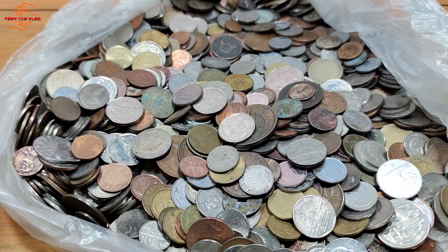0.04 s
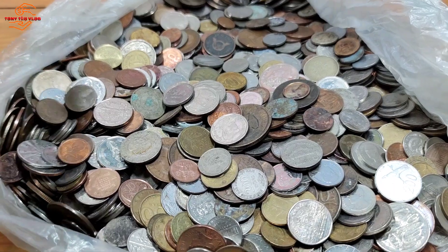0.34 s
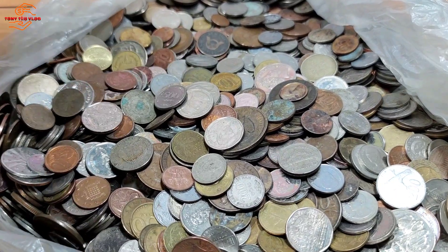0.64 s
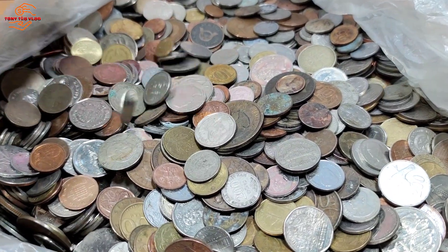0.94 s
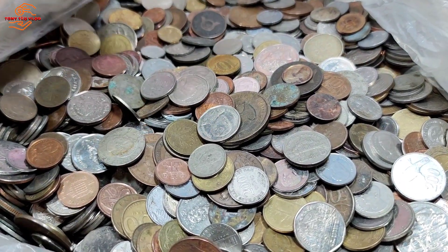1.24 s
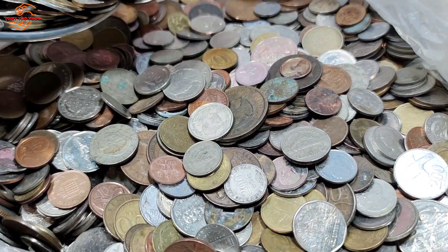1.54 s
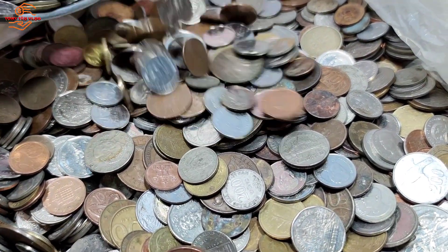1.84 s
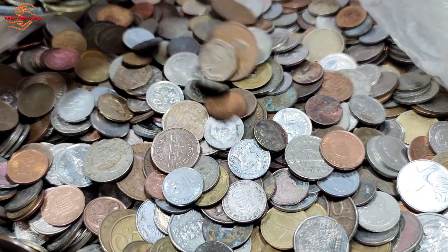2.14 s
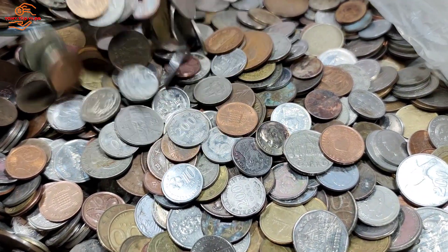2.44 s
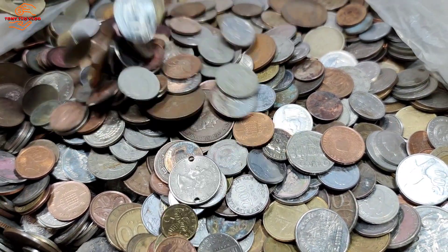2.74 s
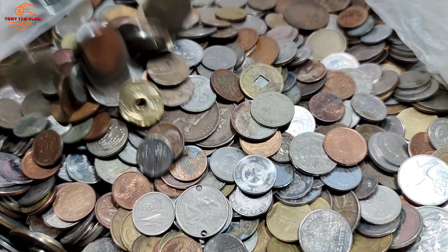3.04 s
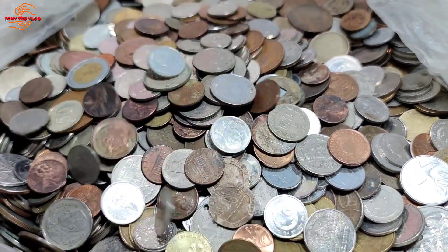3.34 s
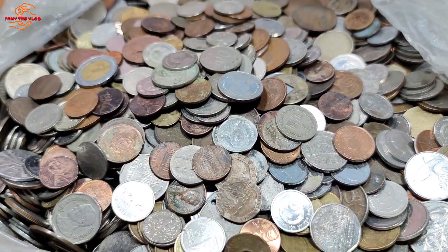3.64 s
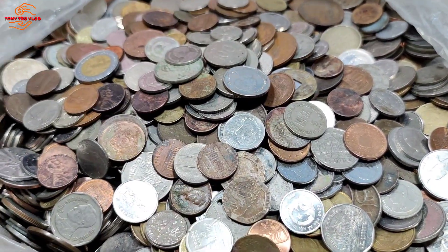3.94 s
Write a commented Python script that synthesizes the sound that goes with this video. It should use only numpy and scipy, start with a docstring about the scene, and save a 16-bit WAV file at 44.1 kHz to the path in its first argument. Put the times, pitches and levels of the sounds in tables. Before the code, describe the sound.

Coins pour from a metal scoop onto a heap, scraping and clinking close up.

```python
"""Coins pour from a metal scoop onto a heap of coins in a plastic bag on a wooden table, very close.
They scrape along the scoop and excite its resonance; a few drop, then the rest tumble down in surges.
Each impact radiates a click, struck coins ring in damped modes, and landing clumps make the table thud.
The left microphone favours the bright clink, the right the lower rasp; the loudest hits overload both."""
import sys
import numpy as np
from scipy import signal
from scipy.io import wavfile

SR = 44100
rng = np.random.default_rng(int(sys.argv[2]) if len(sys.argv) > 2 else 0)


def transcribe(signal):
    """Save signal, clipped to [-1, 1], as a 16-bit WAV file at the path in sys.argv[1]."""
    frames = np.atleast_2d(signal).T
    limited = np.clip(frames, -1, 1)
    pcm = np.round(limited * 32767).astype(np.int16)
    wavfile.write(sys.argv[1], SR, pcm)


N = 176400

# spectrum of the room noise: frequency_hz, left_db, right_db
ROOM_COLOUR = [(25, -1, -23.5), (100, 0.5, -1), (200, -9, -9), (400, -8, -8.5), (990, -18, -13.5),
               (2500, -27, -17), (4500, -35, -37), (7100, -40, -38), (8440, -23.5, -50),
               (11000, -43.5, -44), (15000, -34.5, -51)]
# envelope of the room noise: time_s, level_db
ROOM_LEVEL = [(0, -90), (.04, -82), (.065, -56.5), (.3, -46), (2, -41), (4, -47.5)]

# resonance of the scoop, rising as it empties: time_s, pitch_hz
SCOOP_PITCH = [(.35, 2480), (.6, 2320), (1.3, 2630), (1.689, 2790), (1.74, 2540), (3.1, 2757), (3.75, 2800),
               (3.8, 2857)]
# four slides along the scoop, one envelope each: time_s, level_db
SLIDES = [
    [(.3, -63), (.34, -37.5), (.47, -28.5), (.55, -21), (.62, -19), (.8, -18), (.865, -20.5), (.9, -29.5),
     (.99, -41.5)],
    [(1.0, -42), (1.1, -29.5), (1.18, -31), (1.25, -23), (1.28, -20), (1.39, -23), (1.48, -32.5),
     (1.55, -52), (1.6, -39)],
    [(1.59, -54), (1.677, -29.5), (1.69, -19), (1.74, -17.5), (1.81, -19), (1.95, -34), (2.1, -25),
     (2.3, -29.5), (2.78, -26.5), (2.95, -41), (3.09, -28), (3.2, -33.5), (3.54, -47)],
    [(3.67, -55), (3.715, -37), (3.76, -33), (3.82, -31), (3.845, -48), (3.95, -74.5)],
]
# shimmer of rubbing coin faces, one value for each slide: gain_db
SHEEN_DB = [-5, -12, -12, 8]
# spectrum of sliding coins: frequency_hz, left_db, right_db
SLIDE_COLOUR = [(60, -24, -20), (250, -37, -27.5), (775, -13, -20.5), (1430, -14.5, -17), (1960, -9.5, -11),
                (2340, -12.5, -2.5), (3040, -10, -6), (3850, -15.5, -24.5), (5430, -18, -18),
                (6620, -18, -31), (7940, -3, -28), (8410, 1, -44), (10050, -7, -49.5), (11700, -14.5, -20),
                (13400, -9, -18), (15800, -34, -11)]
# coins knocking on the scoop: start_s, pitch_hz, left_db, right_db, t60_s
KNOCKS = [(.871, 2320, -24, 7.5, 0.011), (1.68, 2860, 7, 19.5, 0.0051), (1.717, 2770, -5, 9, .008),
          (1.727, 2640, -20, -3, .04), (2.759, 2820, -34.5, -19, 0.12), (3.083, 2833, -33, -11.5, .12),
          (3.775, 3090, -29, -14, 0.087)]

# clumps landing on the heap: start_s, clatter_db, thud_db
LANDINGS = [(0.982, -26.5, -42), (1.007, -24, -20), (1.112, -32, -13), (1.435, -20.5, -19),
            (1.536, -35.5, -10), (1.757, -27.5, -35), (1.83, -17.5, -19), (1.847, -19, -18.5),
            (1.963, -35.5, -16), (2.034, -30, -8), (2.057, -32, -15.5), (2.152, -28, -35),
            (2.17, -25, -9.5), (2.277, -28, -25), (2.496, -26.5, -17), (2.581, -24, -17), (2.597, -25, -13),
            (2.795, -26, -39), (2.88, -26, -27), (2.912, -34, -17), (2.957, -36.5, -17.5),
            (2.988, -29.5, -10), (3.023, -40, -16), (3.125, -23.5, -19), (3.142, -17, -9),
            (3.156, -20.5, -14), (3.264, -25, -21), (3.288, -26.5, -20), (3.33, -32.5, -10),
            (3.371, -26, -12.5), (3.396, -28, -14), (3.441, -33.5, -22), (3.474, -30, -8.5),
            (3.509, -24.5, -14), (3.596, -29, -7)]
# spectrum of a landing's clatter: frequency_hz, left_db, right_db
CLATTER_COLOUR = [(30, 12, -13.5), (120, 4, -32), (288, 5.5, -14.5), (700, 3, -15), (1510, 0, -15),
                  (3220, -1.5, -15), (4840, -9.5, -22.5), (7700, -21.5, -20), (9900, -7, -29),
                  (12700, -1, 2), (16000, -16, -10)]
# coins that ring freely: start_s, pitch_hz, left_db, right_db
RINGS = [(0.591, 9950.0, -15, -51), (1.004, 13480, -22, -14), (1.442, 11500, -22, -45),
         (1.777, 15520.0, -18, -26), (1.83, 9860, -13, -38), (1.987, 9350.0, -15, -54),
         (2.057, 12160, -18, -49), (2.157, 10000.0, -19, -46), (2.172, 14670.0, -26, -13),
         (2.227, 12500, -15.5, -35), (2.277, 9900, -23, -38), (2.327, 13400, -23, -15),
         (2.412, 13400, -18.5, -25), (2.409, 14000, -32, -19), (2.581, 10100, -10.5, -37),
         (2.671, 9620, -12.5, -55), (2.726, 9910, -8, -30), (2.761, 13000, -27, -13),
         (2.859, 9800, -10, -35), (3.015, 14300, -36, -15.5), (3.072, 9860, -9.5, -38),
         (3.239, 13500, -21, -16), (3.403, 15420.0, -13, -26), (3.507, 9760, -16.5, -37),
         (3.635, 13700, -30, -37)]
# single sharp clinks: start_s, length_s, edge_db, rasp_db
CLINKS = [(0.359, 0.0038, -13.5, -13.5), (0.561, 0.0032, -6.5, -36), (0.752, 0.0094, -5.5, -15),
          (0.77, 0.018, -7.5, -12), (0.817, 0.0053, -3.5, -9), (0.981, 0.0027, -7, -11),
          (1.004, 0.0055, -3, -16.5), (1.116, 0.0014, -8, -21), (1.129, 0.0022, -13, -16),
          (1.159, 0.0021, -18, -15), (1.199, 0.0048, -12, -14), (1.229, 0.0029, -14, -22),
          (1.263, 0.011, -2.5, -11), (1.305, 0.0023, -0.5, -18), (1.368, 0.0044, -6.5, -10),
          (1.435, 0.0082, -5.5, -23), (1.541, 0.0019, -7.5, -22), (1.656, 0.0017, -19, -22),
          (2.058, 0.0031, -6.5, -22), (2.087, 0.0026, -8, -28), (2.1, 0.0076, -5, -22),
          (2.15, 0.0072, -6.5, -25), (2.274, 0.0095, -5, -15.5), (2.435, 0.0016, -12, -34),
          (2.46, 0.001, -1, -19.5), (2.494, 0.014, -9, -30), (2.795, 0.004, -11, -19),
          (2.989, 0.002, -10, -23), (3.067, 0.0076, -9, -26), (3.116, 0.0095, -6.5, -22),
          (3.182, 0.0047, -11, -24), (3.283, 0.0062, -15, -26), (3.325, 0.0015, -4.5, -23),
          (3.378, 0.0065, -5, -33), (3.476, 0.0023, -8, -22), (3.511, 0.0019, -2, -20),
          (3.585, 0.00082, -11.5, -30), (3.597, 0.0015, -6, -28), (3.638, 0.0015, -19, -33),
          (3.646, 0.002, -14.5, -31.5)]
# spectra of a clink's bright edge and of its rasp: frequency_hz, left_db, right_db
EDGE_COLOUR = [(100, -12.5, -66), (1500, -46, -55.5), (3680, -19, -16.5), (6700, -29.5, -21.5),
               (8260, 6, -57), (10030, -0.5, -18.5), (11060, -6, -57), (13400, -11, -5),
               (15400, -6.5, -27.5)]
RASP_COLOUR = [(100, -50, -26.5), (800, -27, -10.5), (1590, -12.5, -7), (2250, -36, 9), (2840, -3, 11),
               (3900, -6, -4.5), (7560, -51, -14.5), (15300, -7, -32)]

# a few coins tumbling before and after the pour, one envelope per drop: time_s, level_db
DROPS = [
    [(.5, -62), (.58, -34), (.86, -49), (.9, -54)],
    [(.98, -16), (1.01, -27), (1.06, -24.5), (1.11, -46)],
    [(1.425, -40), (1.44, -14.5), (1.48, -24.5), (1.53, -31), (1.56, -31.5), (1.6, -39)],
    [(3.52, -48), (3.56, -47), (3.605, -28.5), (3.65, -32.5), (3.69, -48.5), (3.76, -40.5), (3.81, -49),
     (3.85, -66)],
]
# envelope of the main pour: time_s, level_db
POUR_LEVEL = [(1.69, -32), (1.77, -24), (1.92, -22.5), (2.03, -23), (2.2, -21), (2.47, -22), (2.65, -18.5),
              (2.95, -24.5), (3.22, -25), (3.42, -21), (3.53, -33.5)]
# surges of the pour, as a batch leaves the scoop: start_s, length_s, rise_db
SURGES = [(1.755, 0.16, 6.5), (2.088, 0.013, 6), (2.16, 0.022, 6), (2.268, 0.011, 6), (2.33, 0.037, 6),
          (2.419, 0.032, 4), (2.493, 0.026, 7), (2.56, 0.044, 6.5), (2.703, 0.14, 2), (2.868, 0.065, 6),
          (2.984, 0.029, 7), (3.076, 0.11, 7.5), (3.245, 0.036, 6.5)]
# spectrum of tumbling coins: frequency_hz, left_db, right_db
POUR_COLOUR = [(60, -5, -19), (260, -13.5, -26.5), (690, -13.5, -18), (1470, -19, -22), (2400, -25, -22),
               (3740, -25.5, -34.5), (7200, -27, -25.5), (8290, -3.5, -51), (10530, -10.5, -30),
               (11700, -16.5, -30.5), (12530, -11, -14), (14140, -15.5, -13), (15600, -9.5, -17)]

HUM_HZ, HUM_DB = 97, -46
ECHO_DB, ECHO_T60_S = -18.5, .13
SLIDE_DB, SLIDE_PER_S, SLIDE_SPREAD_DB = 4.5, 2600, 3.5
SCOOP_WIDTH_HZ, SCOOP_LEFT_DB, SCOOP_RIGHT_DB = 1000, -20.5, -1.5
GRIT_PER_S, GRIT_SPREAD_HZ, GRIT_T60_S = 200, 300, .04  # harder contacts within a slide
SHEEN_HZ, SHEEN_WIDTH_HZ = 8450, 900
KNOCK_RISE_S = .0017
CLATTER_DB, CLATTER_RISE_S, CLATTER_FALL_S = 14.5, .0031, .0077
THUD_DB, THUD_HZ, THUD_PEAK_S = 2, 89, .0068
TABLE_DB, TABLE_HZ, TABLE_T60_S = -9.5, 272, .045
RING_DB, RING_T60_S, RING_BLUR_HZ = 5.5, .17, 35
TWIN_DB, MEAN_SPLIT_HZ = .5, 44  # a ringing coin's second mode
EDGE_DB, RASP_DB, CLINK_FALL_S, CLINK_DRAG = 1.5, 2.5, .002, .45
POUR_DB, POUR_PER_S, POUR_SPREAD_DB, SURGE_FALL_S = 4.5, 600, 2, .013
JINGLE_DB, JINGLE_PER_S, JINGLE_SPREAD_DB, JINGLE_T60_S = -1.5, 1800, 2.4, .06
JINGLE_LOW_HZ, JINGLE_HIGH_HZ, JINGLE_DETUNE_HZ = 2189, 15500, 92
CHATTER_DB, CHATTER_T60_S = -3, .026
CEILING, BAND_LIMIT_HZ = .95, 15850
TIME_S, LEFT_ONLY = np.arange(N) / SR, np.c_[[1, 0]]


def amp(db):
    """Amplitude grows tenfold for every 20 dB."""
    return 10 ** (np.asarray(db) / 20)


def unit(x):
    """Normalisation to an rms of 1."""
    return x / np.sqrt(np.mean(x ** 2) + 1e-20)


def decay(t, t60):
    """Exponential damping: 60 dB down after t60 seconds."""
    return amp(-60 * t / t60)


def level(curve):
    """Amplitude envelope, linear in decibels between its points and silent outside them."""
    return amp(np.interp(TIME_S, *np.transpose(curve), left=-120, right=-120))


def add(mix, start_s, sound):
    """Superposition: a sound adds to the mix, in place."""
    part = mix[:, max(round(start_s * SR), 0):][:, :sound.shape[-1]]
    part += sound[..., :part.shape[1]]


def convolve(x, response):
    """Linear filtering of each channel by its own impulse response."""
    return signal.fftconvolve(x, response, axes=1)[:, :N]


def colour(x, table, size=4096):
    """Minimum-phase filter per microphone; the stronger side keeps the power of white noise."""
    hz, *sides = np.transpose(table)
    bins_hz = abs(np.fft.fftfreq(size, 1 / SR))
    gain_db = np.array([np.interp(np.log(bins_hz + 1), np.log(hz), side) for side in sides])
    gain_db -= 30 * (bins_hz > BAND_LIMIT_HZ + 900)
    spectrum = np.exp(signal.hilbert(np.log(amp(gain_db))).conj())
    response = np.fft.ifft(spectrum).real[:, :size // 2]
    return convolve(x, response / np.linalg.norm(response, axis=1).max())


def resonate(x, hz, width_hz):
    """Forced vibration of a resonator of gain 1 whose centre follows the curve hz."""
    carrier = np.exp(2j * np.pi * np.cumsum(hz) / SR)
    pole = np.exp(-np.pi * width_hz / SR)
    baseband = signal.lfilter([(1 - pole) ** 2], [1, -2 * pole, pole ** 2], x / carrier + 1e-18)
    return 2 * (carrier * baseband).real


def contacts(per_s, spread_db):
    """Poisson impacts, mostly small, reach the two microphones with different strength."""
    strength = amp(spread_db * np.minimum(rng.exponential(1, N), 3.5))
    struck = rng.random(N) < per_s / SR
    return unit(strength * struck * rng.choice([-1, 1], (2, N)) * rng.uniform(.42, 1, (2, N)))


def rattle(per_s, spread_db):
    """Each impact passes energy to neighbouring coins, which chatter as it decays."""
    hits = contacts(per_s, spread_db)
    retained = decay(1 / SR, CHATTER_T60_S) ** 2
    energy = signal.lfilter([1 - retained], [1, -retained], hits ** 2)
    chatter = np.sqrt(energy) * rng.standard_normal((2, N))
    return unit(hits + amp(CHATTER_DB) * chatter)


def chimes(hits, hz, mean_t60):
    """Impulse response: each contact starts a damped mode at the pitch hz of that moment."""
    out, t60 = np.zeros((2, N)), mean_t60 * (.5 + rng.random(N))
    for i in np.flatnonzero(hits[0]):
        t = np.arange(0, t60[i], 1 / SR)
        ring = np.sin(2 * np.pi * hz[i] * t) * decay(t, t60[i])
        add(out, i / SR, hits[:, i, None] * ring / np.linalg.norm(ring))
    return out


def room_noise():
    """The noise floor: quiet broadband noise and a low hum under one envelope."""
    gain = level(ROOM_LEVEL)
    hum = amp(HUM_DB) * np.sin(2 * np.pi * HUM_HZ * TIME_S) * gain / gain.max()
    return colour(rng.standard_normal((2, N)), ROOM_COLOUR) * gain + hum


def room_echo(x):
    """Reverberation: a diffuse field decays exponentially, uncorrelated at the two microphones."""
    t = np.arange(SR // 2) / SR
    response = rng.standard_normal((2, len(t))) * decay(t, ECHO_T60_S)
    return amp(ECHO_DB) * convolve(x, response / np.linalg.norm(response, axis=1, keepdims=True))


def sliding():
    """Friction: dense contacts drive the scoop's resonance, and rubbing coin faces shimmer."""
    pushes = [level(slide) for slide in SLIDES]
    push = sum(pushes)
    scoop_hz = np.interp(TIME_S, *np.transpose(SCOOP_PITCH))
    scrape = rattle(SLIDE_PER_S, SLIDE_SPREAD_DB)
    hard_hits = contacts(GRIT_PER_S, SLIDE_SPREAD_DB) * push
    grit = chimes(hard_hits, scoop_hz + GRIT_SPREAD_HZ * rng.standard_normal(N), GRIT_T60_S)
    scoop = unit(resonate(scrape, scoop_hz, SCOOP_WIDTH_HZ)) * push + grit
    scoop *= amp(np.c_[[SCOOP_LEFT_DB, SCOOP_RIGHT_DB]])
    sheen = unit(resonate(scrape[0], np.full(N, SHEEN_HZ), SHEEN_WIDTH_HZ))
    sheen *= amp(SHEEN_DB) @ pushes
    return amp(SLIDE_DB) * colour(scrape * push, SLIDE_COLOUR) + scoop + sheen * LEFT_ONLY


def knocks():
    """Impact excitation: a coin catches on the scoop and rings two modes, louder on the right."""
    t, out = np.arange(SR // 6) / SR, np.zeros((2, N))
    for start_s, hz, left_db, right_db, t60 in KNOCKS:
        lower_hz = hz * rng.uniform(.94, .97)
        modes = np.sin(2 * np.pi * hz * t) + .5 * np.sin(2 * np.pi * (lower_hz * t + rng.random()))
        envelope = np.minimum(t / KNOCK_RISE_S, 1) * decay(t, t60)
        add(out, start_s, amp(np.c_[[left_db, right_db]]) * envelope * modes)
    return out


def landings():
    """Momentum transfer: a clump crunches into the heap; the table dips, springs back and rings."""
    t, clatter, thud = np.arange(SR // 12) / SR, np.zeros((2, N)), np.zeros((2, N))
    wood = amp(TABLE_DB) * np.sin(2 * np.pi * TABLE_HZ * t) * decay(t, TABLE_T60_S)
    rise = np.minimum(t / CLATTER_RISE_S, 1)
    fall = np.exp(-np.maximum(t - 2 * CLATTER_RISE_S, 0) / CLATTER_FALL_S)
    for start_s, clatter_db, thud_db in LANDINGS:
        crunch = rise * fall * rng.standard_normal((2, len(t)))
        add(clatter, start_s, amp(clatter_db + CLATTER_DB) * crunch)
        pulse_time = np.pi * THUD_HZ * rng.uniform(.64, 1.25) * (t - THUD_PEAK_S)
        dip = (2 * pulse_time ** 2 - 1) * np.exp(-pulse_time ** 2)
        add(thud, start_s, amp(thud_db + THUD_DB) * (dip + wood))
    return colour(clatter, CLATTER_COLOUR) + thud * LEFT_ONLY


def rings():
    """Two close modes of a bouncing coin beat; touching its neighbours jostles the phase of one."""
    t, out = np.arange(SR // 3) / SR, np.zeros((2, N))
    for start_s, hz, left_db, right_db in RINGS:
        twin_hz = hz + 2 * MEAN_SPLIT_HZ * rng.random()
        twin = amp(TWIN_DB) * np.sin(2 * np.pi * (twin_hz * t + rng.random((2, 1))))
        drift = np.cumsum(rng.standard_normal(len(t))) * np.sqrt(RING_BLUR_HZ / (2 * np.pi * SR))
        modes = np.sin(2 * np.pi * (hz * t + drift)) + twin
        add(out, start_s, amp(np.c_[[left_db, right_db]] + RING_DB) * modes * decay(t, RING_T60_S))
    return out


def clinks():
    """Brief impacts have broad spectra: edge-on hits give milliseconds of bright, rasping chatter."""
    t, edge, rasp = np.arange(SR // 20) / SR, np.zeros((2, N)), np.zeros((2, N))
    for start_s, length_s, edge_db, rasp_db in CLINKS:
        fall_s = CLINK_FALL_S + length_s * CLINK_DRAG  # longer clinks fade more slowly
        burst = rng.standard_normal((2, len(t))) * np.exp(-np.maximum(t - length_s / 2, 0) / fall_s)
        add(edge, start_s, amp(edge_db + EDGE_DB) * burst)
        add(rasp, start_s, amp(rasp_db + RASP_DB) * burst)
    return colour(edge, EDGE_COLOUR) + colour(rasp, RASP_COLOUR)


def coin_flow():
    """Granular flow: the envelope of the small drops and of the pour, which comes in surges."""
    t, surge = np.arange(SR // 4) / SR, np.ones((1, N))
    for start_s, length_s, rise_db in SURGES:
        envelope = np.exp(-np.maximum(t - length_s, 0) / SURGE_FALL_S)
        add(surge, start_s, (amp(rise_db) - 1) * envelope)
    return level(POUR_LEVEL) * surge[0] + sum(level(drop) for drop in DROPS)


def pouring():
    """Random collisions: tumbling coins click and ring, half near the free coins' natural pitches."""
    flow = coin_flow()
    natural_hz = rng.choice(np.array(RINGS)[:, 1], N) + JINGLE_DETUNE_HZ * rng.standard_normal(N)
    pitch_hz = np.where(rng.random(N) < .5, natural_hz, rng.uniform(JINGLE_LOW_HZ, JINGLE_HIGH_HZ, N))
    jingle = chimes(contacts(JINGLE_PER_S, JINGLE_SPREAD_DB) * flow, pitch_hz, JINGLE_T60_S)
    clicks = rattle(POUR_PER_S, POUR_SPREAD_DB) * flow
    return colour(amp(POUR_DB) * (clicks + amp(JINGLE_DB) * jingle), POUR_COLOUR)


def scene():
    """Superposition of the coins' direct sound, its reverberation and the room noise."""
    coins = sliding() + knocks() + pouring() + clinks() + rings() + landings()
    return coins + room_echo(coins) + room_noise()


def record(dry):
    """Overload clips the loudest peaks; a low-pass filter then limits the band."""
    clipped = np.clip(dry, -CEILING, CEILING)
    low_pass = signal.firwin(511, BAND_LIMIT_HZ, window=("kaiser", 8), fs=SR)
    return signal.oaconvolve(clipped, low_pass[None], "same")


dry = scene()
out = record(dry)
transcribe(out)
```